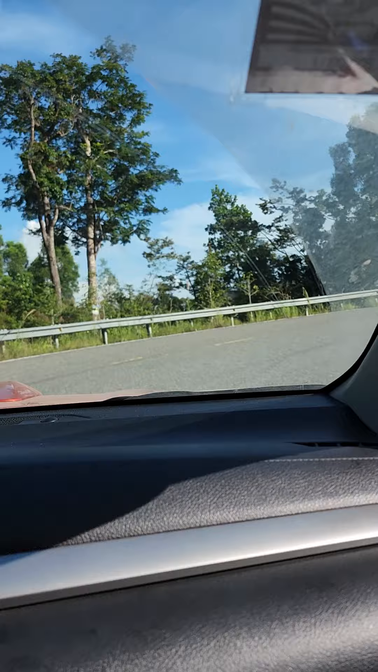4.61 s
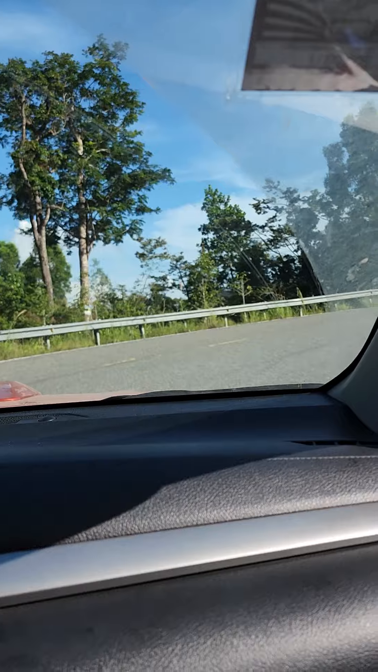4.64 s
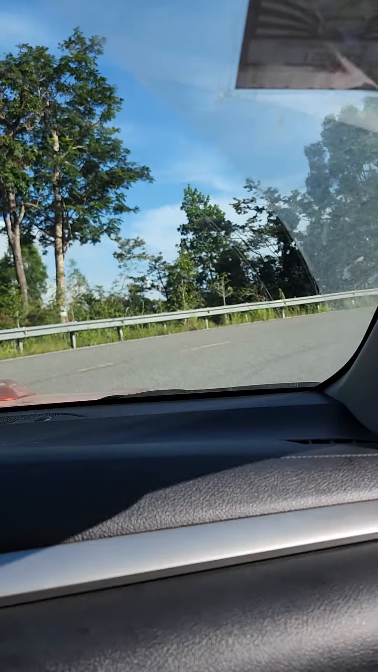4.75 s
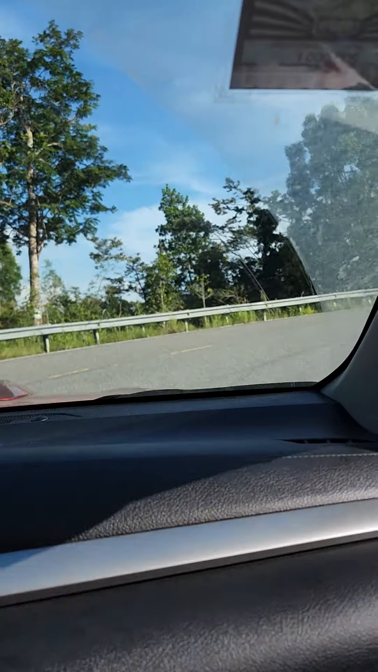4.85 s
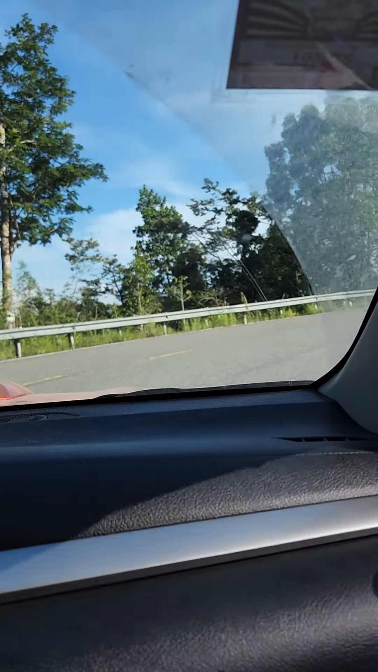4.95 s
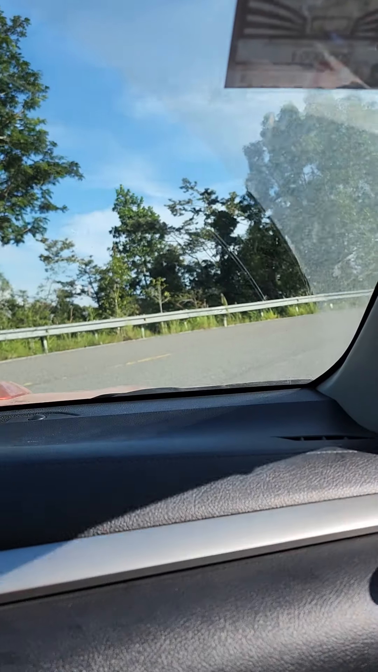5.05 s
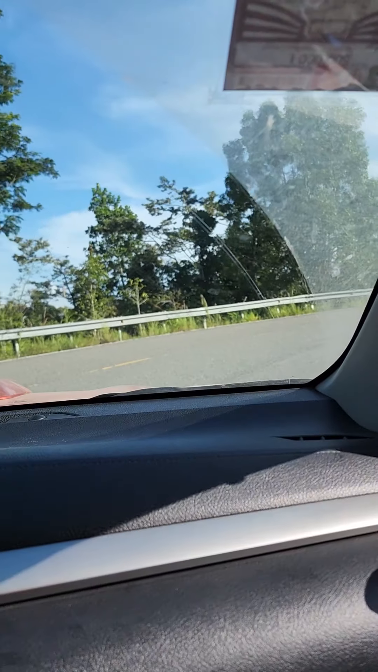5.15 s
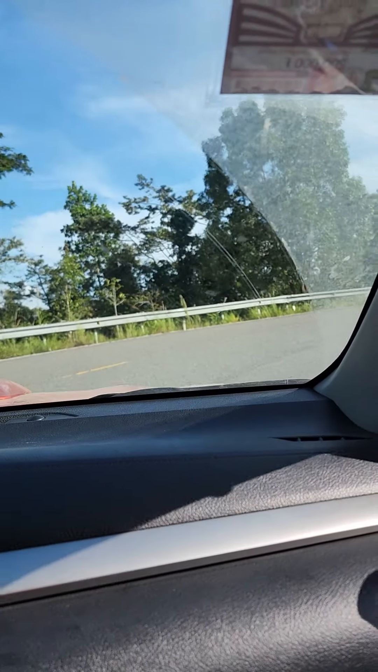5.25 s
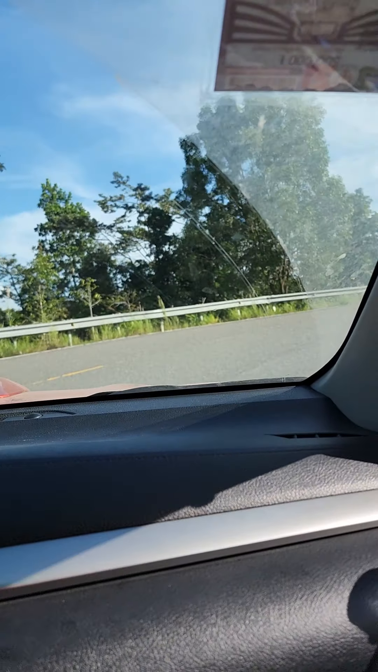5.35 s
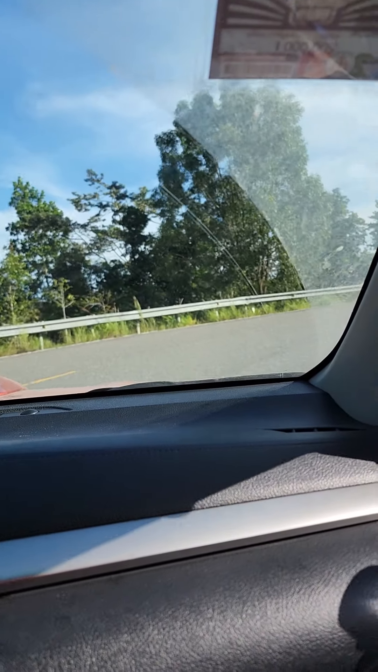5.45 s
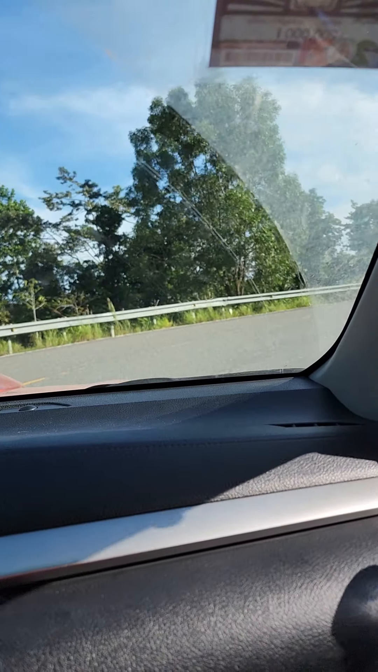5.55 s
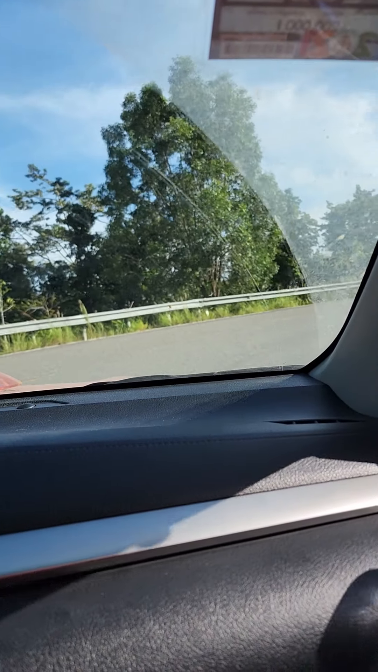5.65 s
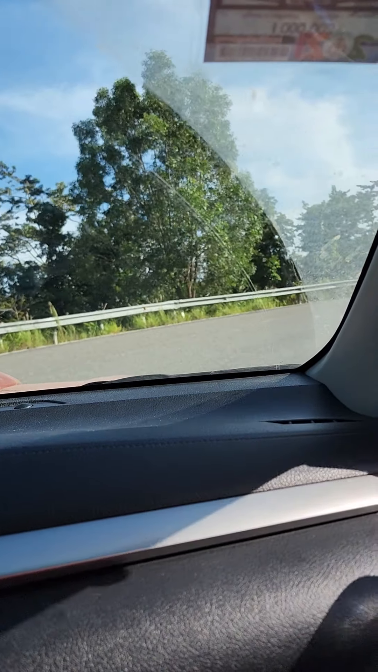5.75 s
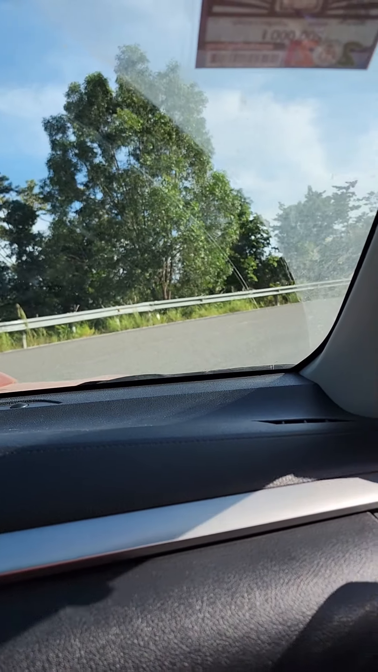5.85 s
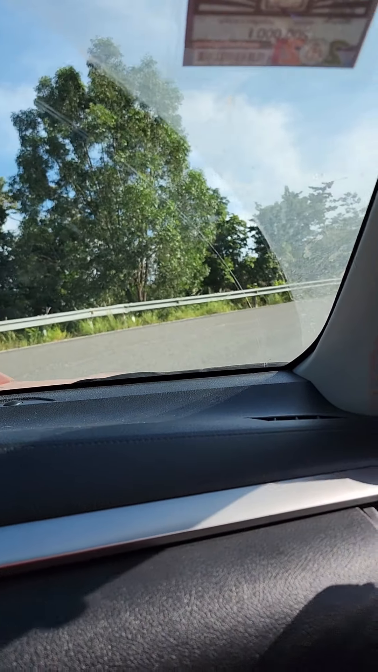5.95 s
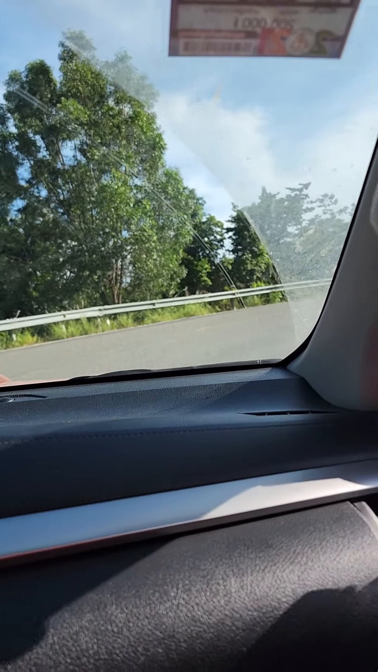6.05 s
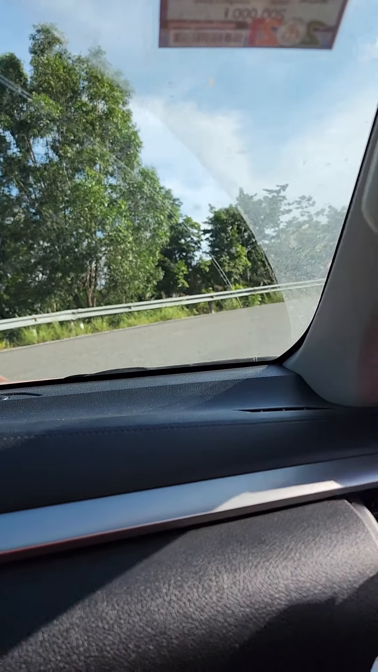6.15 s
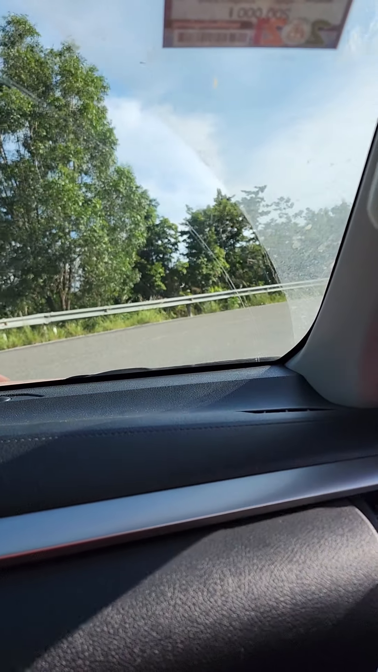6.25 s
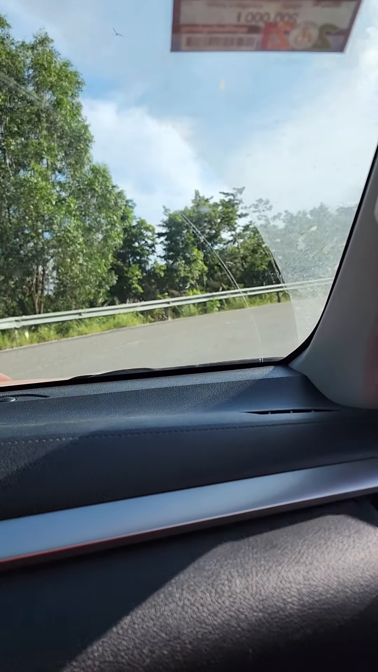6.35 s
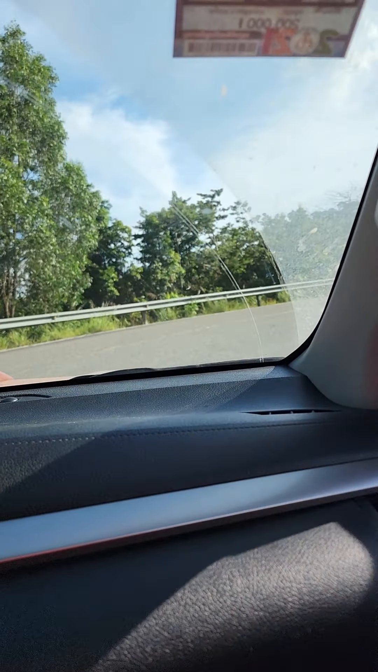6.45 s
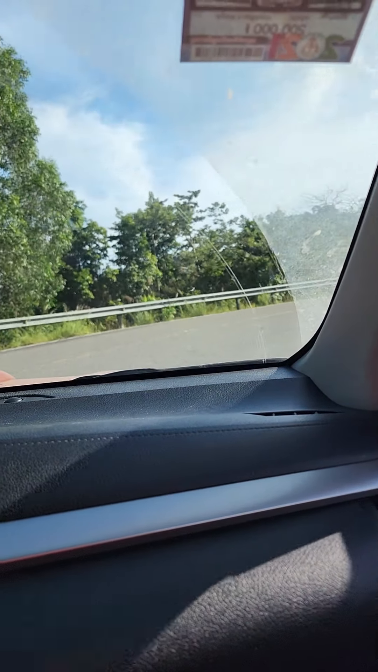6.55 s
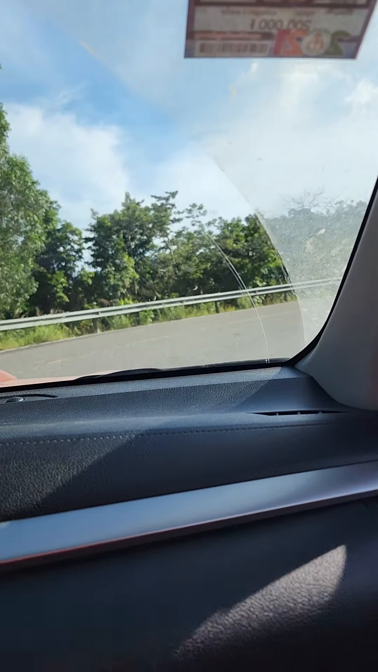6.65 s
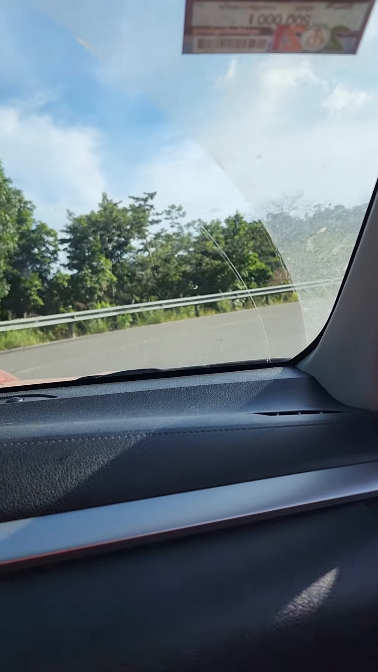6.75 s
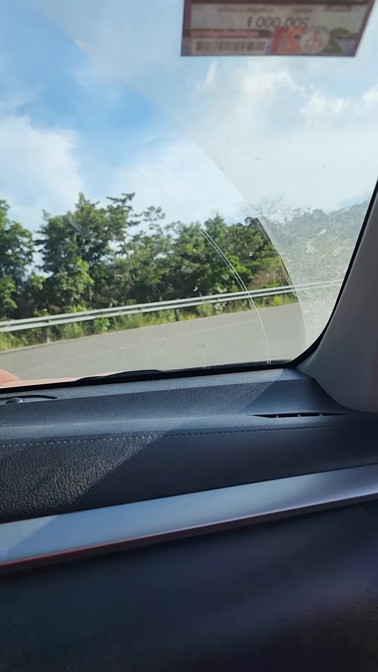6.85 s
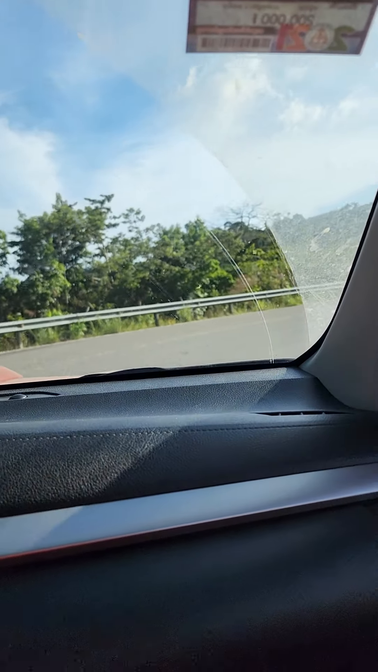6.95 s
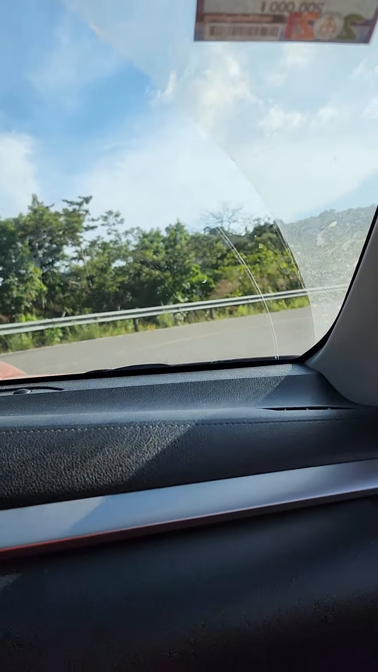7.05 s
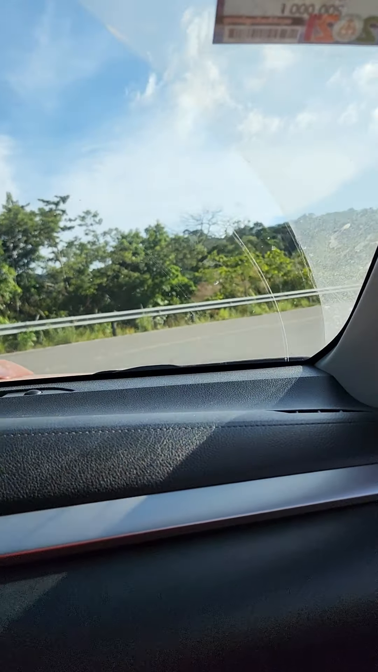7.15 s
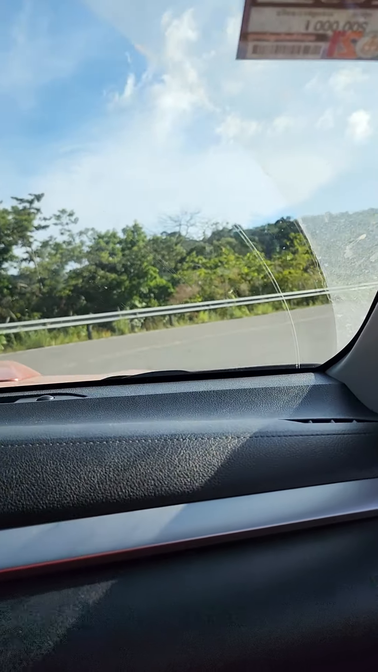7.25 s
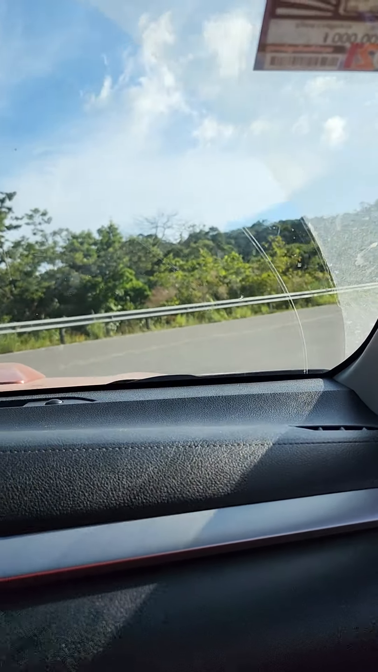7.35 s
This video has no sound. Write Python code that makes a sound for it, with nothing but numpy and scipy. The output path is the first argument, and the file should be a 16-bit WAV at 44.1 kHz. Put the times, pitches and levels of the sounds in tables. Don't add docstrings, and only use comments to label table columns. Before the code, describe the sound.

Car cabin rumble with soft bumps, wind puffs and faint roadside insects, then the diesel engine accelerates and its deep drone climbs to the end.

```python
import sys
import numpy as np
from scipy import signal
from scipy.io import wavfile
from scipy.ndimage import uniform_filter1d

SR = 44100
rng = np.random.default_rng(int(sys.argv[2]) if len(sys.argv) > 2 else 0)


def generate_wav(sig):
    pcm = np.round(np.clip(np.atleast_2d(sig).T, -1, 1) * 32767).astype(np.int16)
    wavfile.write(sys.argv[1], SR, pcm)


def undo_db(level):
    steps = np.asarray(level, float) / 20
    return 10 ** steps


N = 326420


def evened(x):
    return x / np.sqrt(np.mean(x ** 2) + 1e-20)


def read(points, hz):
    table_hz, value = np.transpose(points)
    return np.interp(np.log(hz + 1), np.log(table_hz + 1), value)


def played(rows):
    start_s, *columns = np.transpose(rows)
    return [np.interp(np.arange(N) / SR, start_s, column) for column in columns]


def add(mix, start_s, sound):
    part = mix[:, max(round(start_s * SR), 0):][:, :sound.shape[1]]
    part += sound[:, :part.shape[1]]


def panned(x, left_db):
    return x * undo_db(np.array([[left_db / 2], [-left_db / 2]]))


def swell(middle_s, half_s, db):
    return undo_db(db) * np.exp(-.5 * ((np.arange(N) / SR - middle_s) / half_s) ** 2)


def waver(rate_hz):
    steps_per_s = 40
    steps = rng.standard_normal(int(N / SR * steps_per_s) + 2)
    steps = evened(uniform_filter1d(steps, size=max(int(steps_per_s / rate_hz), 1)))
    return np.interp(np.arange(N) / SR * steps_per_s, np.arange(len(steps)), steps)


def whistle(hz, gain, width_hz):
    edge = np.clip(width_hz / SR, 1e-4, .4)
    slow = signal.lfilter(*signal.butter(2, edge), rng.standard_normal((2, 2, N), dtype=np.float32))
    turn = 2 * np.pi * np.cumsum(hz * np.ones(N)) / SR
    carried = slow[0] * np.cos(turn) + slow[1] * np.sin(turn)
    return gain * evened(carried) * np.sqrt(2)


# [Hz, dB]
USUAL_WIDTH = [(60, -14), (150, -13), (380, -7), (950, -2.5), (2380, -1), (5980, 0.5), (15000, 1)]
# [Hz, dB]
LEFT_LEAN = [(60, -4), (110, 2), (200, -1.5), (380, 3), (700, 2), (1290, -2), (2380, 2.5), (4400, 0.0),
             (8120, 2), (15000, 3)]


def noise(colour, size, patchy_db, side=USUAL_WIDTH):
    hop = size // 4
    hz = np.fft.rfftfreq(size, 1 / SR)
    used = hz[hz <= colour[-1][0]]
    draws = rng.standard_normal((N // hop + 5, len(used), 5), dtype=np.float32)
    a, b, c, d, patches = draws.T
    patches = uniform_filter1d(patches, size=8, axis=0)
    patches = evened(uniform_filter1d(patches, size=12, axis=1))
    mid = a + 1j * b
    apart = undo_db(read(side, used))[:, None] * (c + 1j * d)
    lean_db = read(LEFT_LEAN, used)[:, None] / 2
    z = np.array([mid + apart, mid - apart])
    z *= undo_db(read(colour, used)[:, None] + patchy_db * patches)
    z *= undo_db(np.array([lean_db, -lean_db]))
    z = np.pad(z.astype(np.complex64), ((0, 0), (0, len(hz) - len(used)), (0, 0)))
    x = signal.istft(z, nperseg=size, noverlap=size - hop)[1][:, :N]
    return x / np.std(x.mean(0))


def chirp(db, hz, left_db, length_s, fall_hz):
    u = np.arange(int(length_s * SR)) / (length_s * SR)
    port_phase = np.array([[0], [1.2]])
    tone = np.sin(2 * np.pi * np.cumsum(hz - fall_hz * u ** 3.8) / SR + port_phase)
    tone = np.pad(tone * signal.windows.tukey(len(u), .5), ((0, 0), (0, 400)))
    echo = 0.38 * np.roll(tone, 330, axis=1)
    return panned(undo_db(db) * (tone + echo), left_db)


# [s, s, Hz, dB, Hz]
CICADAS = [
    (7.1, .55, 6300, -75, 350),
    (4.3, .9, 10400, -85, 600),
]
# [s, dB]
CRICKET = [(2.2701, -65), (2.3306, -70), (2.7382, -61), (2.796, -63), (2.9693, -53), (3.03, -50.5),
           (3.2076, -58), (3.2694, -60), (3.445, -54), (3.5014, -53.5), (3.692, -51.5), (3.7431, -55),
           (3.8681, -67), (3.9282, -58), (3.9814, -55), (4.156, -57), (4.2201, -54), (4.4034, -56.5),
           (4.4742, -61), (4.5867, -64), (4.6458, -59), (4.6942, -61.5), (4.8166, -63), (4.8912, -62),
           (4.9422, -63), (5.0691, -63), (5.1243, -59),
           (5.3637, -65),
    (5.43, -67),
    (5.656, -64),
    (5.8172, -67),
    (5.8897, -67),
]
# [s, s, dB, Hz]
KATYDID = [
    (.0994, .05, -61.5, 7680),
    (.3576, .032, -62, 7640),
    (.5994, 0.061, -64.5, 7620),
    (3.1887, .051, -61, 7403),
    (3.4246, 0.049, -62, 7408),
    (3.6661, 0.046, -62, 7360),
    (3.9065, .057, -65, 7370),
    (4.852, .055, -69, 7350),
    (5.09, .052, -67, 7355),
    (5.3271, .04, -64, 8000),
]
# [s, s, Hz, dB, dB]
TRILLS = [
    (2.388, 2.771, 4950, -63, -59),
    (3.386, 3.8, 4777, -67, -60),
    (4.104, 4.5, 4943, -62, -61),
    (4.57, 4.95, 4842, -63, -65),
]


def insects():
    out = sum(whistle(hz, swell(s, half_s, db), width_hz) for s, half_s, hz, db, width_hz in CICADAS)
    for s, db in CRICKET:
        past_s = s - 3.3
        hz = 7030 - 70 * past_s
        left_db = .8 + 2 * abs(past_s)
        add(out, s - .009, chirp(db - 3.0, hz, left_db, length_s=.036, fall_hz=560))
    for s, gap_s, db, hz in KATYDID:
        for stroke_s in (s, s + gap_s):
            add(out, stroke_s - .006, chirp(db - .6, hz, 2.2, length_s=0.027, fall_hz=40))
    for start_s, end_s, hz, first_db, last_db in TRILLS:
        for s in np.arange(start_s, end_s, .057):
            db = np.interp(s, [start_s, end_s], [first_db, last_db])
            pulse = chirp(db, hz, 0, length_s=0.019, fall_hz=251.2)[0] * 0.96
            add(out, s, pulse * np.array([[1], [-.25]]))
    return out


# [s, dB]
TICKS = [
    (1.114, -35),
    (2.691, -54),
    (3.388, -49),
]


def grit():
    out, t = np.zeros((2, N)), np.arange(700) / SR
    band = signal.butter(3, [1500, 4000], "band", fs=SR)
    fade_s = .0025
    for s, db in TICKS:
        burst = signal.lfilter(*band, rng.standard_normal(len(t)) * np.exp(-t / fade_s))
        add(out, s, panned(undo_db(db) * burst, -1.5))
    return out


# [s, dB]
GUSTS = [
    (.5, -36),
    (1.0, -34.5),
    (1.4, -31.5),
    (2.27, -34),
    (2.52, -31),
    (2.83, -32),
    (3.27, -32),
    (3.47, -36),
    (3.87, -27.5),
    (4.32, -36),
]
# [Hz, dB per Hz]
WIND_COLOUR = [(20, -13), (50, 19.5), (100, 6.5), (180, 9.5), (280, -12.5), (500, -50.5), (700, -80)]


def wind():
    sheltered = np.arange(N) / SR > 4.4
    breeze = undo_db(-48 - 10 * sheltered + 3.0 * waver(6))
    gusts = breeze + sum(swell(s, 0.058, db) for s, db in GUSTS)
    buffeting = noise(WIND_COLOUR, size=1024, patchy_db=6.5, side=[(20, 0.0088), (500, 0.014)])
    return gusts * undo_db(0.82 * waver(26)) * buffeting


# [s, Hz, dB]
TURBO = [
    (4.9, 4800, -93),
    (5.05, 5200, -68),
    (5.4, 6290, -71),
    (5.65, 7800, -82),
    (5.9, 9200, -73),
    (6.2, 10640, -82),
    (6.7, 12980, -76),
    (7.2, 14990, -66),
    (7.4, 16200, -68),
]
# [s, dB]
AIR_FLOW = [(0, 0), (.3, -5), (1.3, -10.5), (2, -18), (3.8, -17), (4.1, -7), (4.26, -10), (4.3, -17),
            (4.85, -15), (5.15, -13), (6, -14), (6.6, -6), (7.36, -2.5), (7.4, 10.5)]
# [s, dB]
LOAD = [(0, -3), (1.2, -4), (1.6, -1), (3.2, 1), (3.6, -4.5), (4.1, 0), (4.65, 1.5), (4.85, 3), (5.1, 8.5),
        (5.4, 13), (6.03, 14.5), (6.9, 14), (7.3, 12.5), (7.4, 15)]
FULL_LOAD_DB = 16.5


def turbocharger():
    t = np.arange(N) / SR
    (flow_db,), (hz, db) = played(AIR_FLOW), played(TURBO)
    load_db = played(LOAD)[0] - FULL_LOAD_DB
    out = whistle(hz * (1 + 0.017 * waver(40)), undo_db(db + 2.0 * waver(8.8)), width_hz=700)
    coast_db = -62 - 2.1 * t - 13.5 * t ** 2 / 2
    out += whistle(8000 - 650 * t, undo_db(coast_db), width_hz=2200)
    out += whistle(14500, undo_db(-73 + 1.3 * flow_db), width_hz=1400)
    rising_hz = np.interp(t, [5, 6.4], [13900, 14900])
    out += whistle(rising_hz, undo_db(-76.5 + 1.4 * load_db), width_hz=900)
    boost_hiss = whistle(8450, undo_db(-69 + 1.3 * load_db), width_hz=3400)
    return panned(out, 3.0) + boost_hiss


# [s, dB]
SURFACE = [(0, -8.5), (.5, -15), (1.3, -10), (1.45, -2.5), (2.3, -2.5), (2.38, -15), (2.7, -7), (2.78, 1),
           (3.3, 0), (3.9, 0.5), (4.3, -2), (4.85, 2), (5.5, 2), (6.1, 3), (7.4, 7)]
# [s, dB]
SPEED = [
    (0, 0),
    (1.5, -1),
    (3, -3.5),
    (4.85, -6),
    (5.2, -5),
    (6, -3.5),
    (7.36, -1.5),
    (7.4, 2),
]
# [Hz, dB per Hz]
RUMBLE = [(12, -40), (20, -10), (38, -1), (59, -3), (81, -4.5), (134, 1.5), (167, -12), (199, -3.5),
          (238, -10.5), (330, -21), (430, -29.5), (730, -120)]
# [Hz, dB per Hz]
ROAR = [(180, -14), (300, -1.5), (400, -0.5), (506, 0), (566, -8.5), (716, 1), (795, -4.5), (898, -3.5),
        (980, -11.5), (1310, -10), (1650, -20), (2400, -30), (3120, -48), (5280, -120)]
# [Hz, dB]
ROAR_WIDTH = [(280, -11.5), (400, -14.5), (570, -2), (710, -12), (860, -2.5), (1000, -1.5), (1300, -4.5),
              (1700, -3), (2400, 0), (5000, -6)]
# [Hz, dB per Hz]
TREAD = [(800, -29.5), (1000, 2.5), (1250, 3.5), (1600, 1.5), (2000, -7.5), (2600, -18.5), (3200, -41)]
# [Hz, dB per Hz]
HISS = [(1290, -20.5), (2200, 0), (2450, -4.5), (3130, -5), (3820, -10), (4170, -8), (4610, -10.5),
        (5480, -11), (6820, -14.5), (7740, -14.5), (8500, -17), (10000, -24), (10800, -33.5),
        (14000, -58.5), (22000, -120)]
# [Hz, dB per Hz]
FIZZ = [(6350, -35), (10800, -5), (12100, -3.5), (15100, -4), (15700, 2)]


def road():
    (coarse_db,), (speed_db,), (flow_db,) = played(SURFACE), played(SPEED), played(AIR_FLOW)
    fading_db = np.interp(np.arange(N) / SR, [4.7, 5.2], [0, -4])

    thud_colour = [(14, -36.0), (25, -11), (36, 6), (55, 5.5), (68, 4.0), (100, -56)]
    thuds = noise(thud_colour, size=2048, patchy_db=1.5, side=[(20, -25), (99, -32.5)])
    out = undo_db(-34 + 0.49 * coarse_db + 1.0 * waver(7.3) + 0.76 * fading_db) * thuds

    ring_colour = [(150, -44.5), (185, -1.5), (200, 2.5), (215, -10.5), (250, -39.0)]
    ring = noise(ring_colour, size=4096, patchy_db=-0.3, side=[(150, -25), (250, -22.0)])
    out += undo_db(-39.0 + .25 * coarse_db + 10.0 * fading_db) * ring

    rumble_width = [(60, -30.0), (220, -25.5), (280, -3.0)]
    rumble = noise(RUMBLE[3:], size=2048, patchy_db=2.0, side=rumble_width)
    out += undo_db(-29.5 + 0.92 * coarse_db + 1.2 * waver(6) + 0.53 * fading_db) * rumble

    roar = noise(ROAR, size=1024, patchy_db=0.84, side=ROAR_WIDTH)
    out += undo_db(-39.0 + 0.27 * speed_db + 0.042 * coarse_db) * roar
    tread = noise(TREAD, size=1024, patchy_db=1.6, side=ROAR_WIDTH)
    out += undo_db(-46.0 + 1.52 * speed_db) * tread
    hiss = noise(HISS, size=512, patchy_db=1.0)
    out += undo_db(-56.5 + 0.94 * speed_db - 1.04 * fading_db + 0.37 * waver(13)) * hiss
    fizz = noise(FIZZ, size=512, patchy_db=.6)
    return out + undo_db(-69 + 0.82 * flow_db + .6 * waver(13)) * fizz


# [s, dB]
BUMPS = [
    (.115, -22),
    (1.02, -32),
    (1.441, -22),
    (2.289, -24),
    (3.445, -13),
]


def bumps():
    t = np.arange(N) / SR
    swing_s, swing_hz = .011, 45
    out = 0
    for s, db in BUMPS:
        swing = np.sin(2 * np.pi * swing_hz * (t - s) + .5 * np.pi)
        out = out + swell(s + swing_s, swing_s, db) * swing
    return out


# [s, Hz]
IDLE = [
    (0, 25.6),
    (.7, 27.28),
    (2.05, 26.04),
    (4.72, 26.13),
]
# [s, Hz]
PULL = [
    (4.85, 28.0),
    (5.01, 33.26),
    (5.11, 36.85),
    (5.38, 42.3),
    (5.62, 43.64),
    (6.04, 49.2),
    (6.31, 51.04),
    (7.14, 54.5),
    (7.4, 56.65),
]
MAIN_ORDERS_DB = [-25, -30, -34, -31.5]
IDLE_LOSS_DB = [4, -1, 3, 2]
PORT_LAG = [.1, .25, 0.11, 0.25]
# [Hz, Hz, dB]
BOOMS = [(33.6, 9, -5.5), (48.7, 15.8, -0.5), (80, 18, -11.5), (114, 10.5, -11.5), (130.7, 16.8, -6),
         (162.6, 7.6, -17), (208.25, 35, -15)]
# [times, dB]
UPPER_ORDERS = [(1.5, -35.5), (2.5, -40), (3.5, -44.5), (4.5, -57), (5, -44.5), (6, -44.5), (7, -54),
                (8, -55.5)]
# [Hz, Hz, dB]
CABIN = [(172, 17, 12.5), (255, 31, 7.5)]


def engine():
    (firing_hz,), (load_db,) = played(IDLE + PULL), played(LOAD)
    idling = np.clip(1 - load_db / 6, 0, 1)
    shake_db = 0.64 * idling * played(SURFACE)[0]
    turn = 2 * np.pi * np.cumsum(firing_hz) / SR
    out, ports = np.zeros((2, N)), np.array([[.5], [-.5]])
    for k, (db, lag) in enumerate(zip(MAIN_ORDERS_DB, PORT_LAG), 1):
        shaken = turn + (.012 + .3 * idling) * waver(8)
        boom = undo_db(-33.5)
        for mode_hz, width_hz, mode_db in BOOMS:
            boom = boom + undo_db(mode_db) / (1 + (2 * (k * firing_hz - mode_hz) / width_hz) ** 2)
        flutter_db = 0.3 * k * waver(12) + (0.26 + 4.4 * idling) * waver(4)
        level_db = db + load_db + shake_db + flutter_db - IDLE_LOSS_DB[k - 1] * idling
        out += boom * undo_db(level_db) * np.sin(k * shaken + lag * ports + 6 * rng.random())
    for k, db in UPPER_ORDERS:
        boom = 1
        for mode_hz, width_hz, mode_db in CABIN:
            boom = boom + (undo_db(mode_db) - 1) / (1 + (2 * (k * firing_hz - mode_hz) / width_hz) ** 2)
        level_db = 0.66 * (load_db - FULL_LOAD_DB) - 3 + db + 1.8 * waver(11)
        out += boom * undo_db(level_db) * np.sin(k * turn + 0.8 * waver(12) + 6 * rng.random())
    return panned(np.sqrt(2) * out, -.4)


def scene():
    outside = insects() + grit() + wind()
    return outside + turbocharger() + road() + bumps() + engine()


def band_limit(x):
    return signal.sosfilt(signal.butter(12, 16550, fs=SR, output="sos"), x)


def record(dry):
    low_cut = signal.butter(2, 23, "high", fs=SR, output="sos")
    high_cut = signal.ellip(14, .1, 90, 15770, fs=SR, output="sos")
    cut = signal.sosfilt(high_cut, signal.sosfilt(low_cut, dry))
    fade = np.sin(np.pi / 2 * np.clip(np.arange(N, 0, -1) / 300, 0, 1)) ** 2
    return band_limit(cut * fade)


dry = scene()
out = record(dry)
generate_wav(out)
```